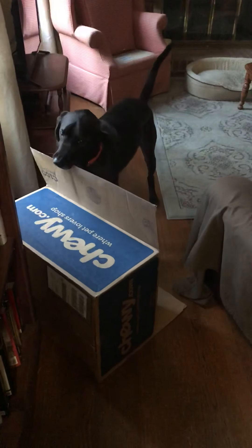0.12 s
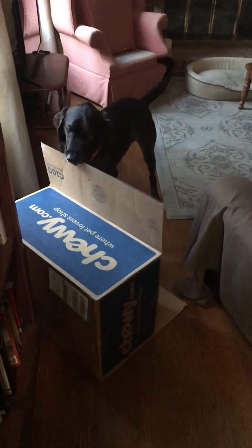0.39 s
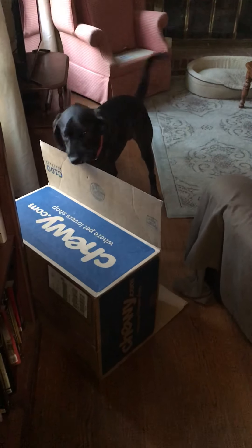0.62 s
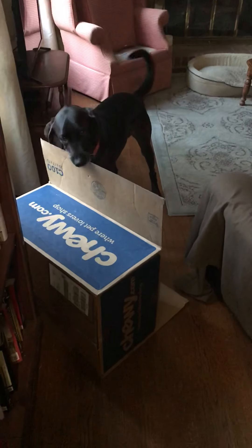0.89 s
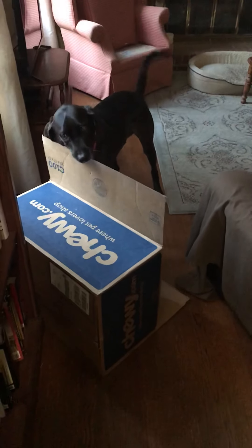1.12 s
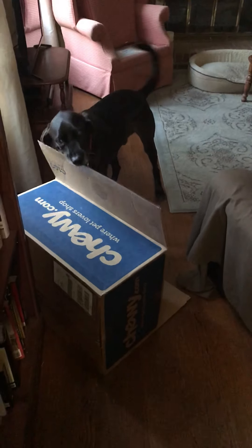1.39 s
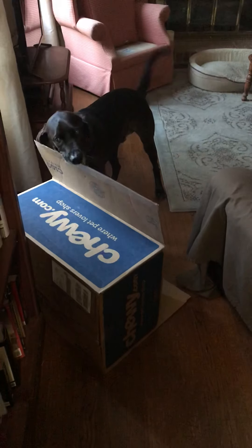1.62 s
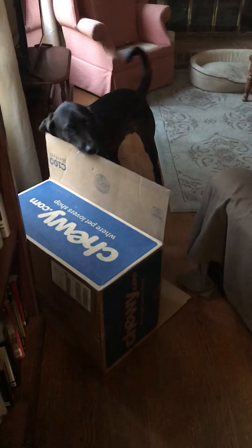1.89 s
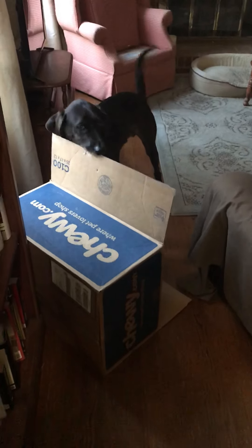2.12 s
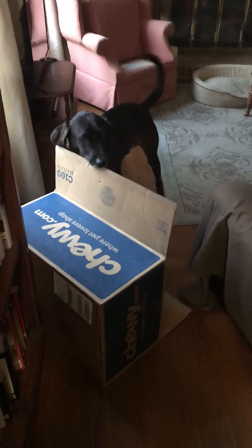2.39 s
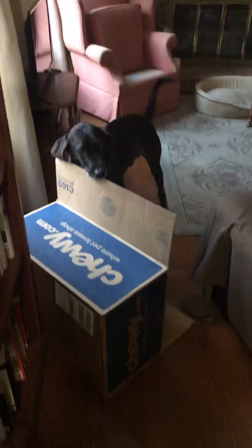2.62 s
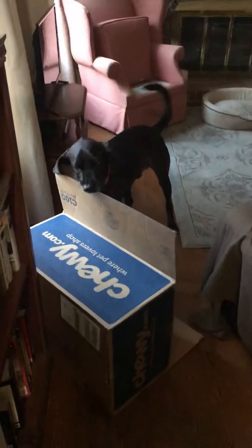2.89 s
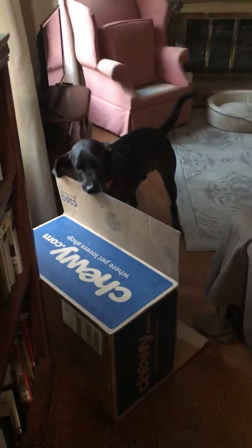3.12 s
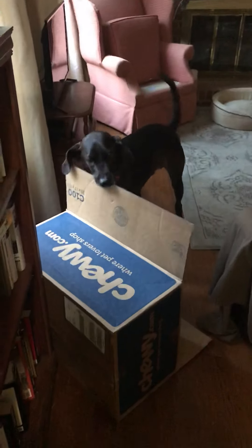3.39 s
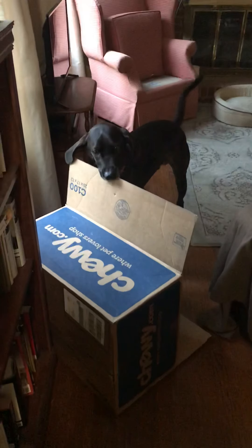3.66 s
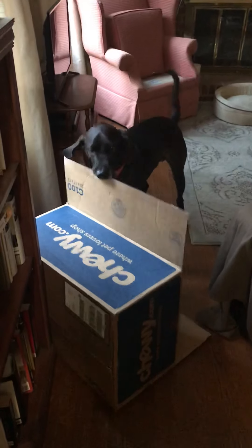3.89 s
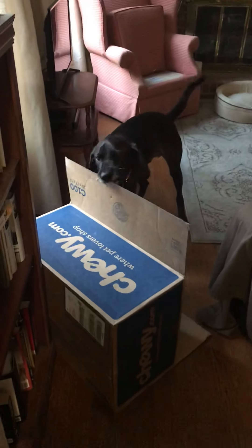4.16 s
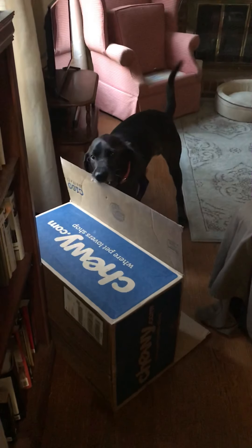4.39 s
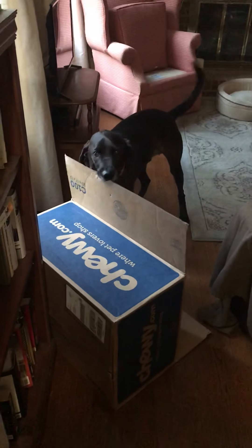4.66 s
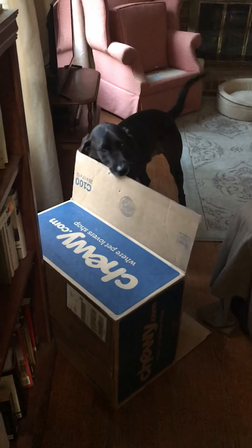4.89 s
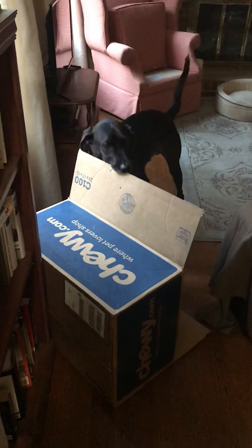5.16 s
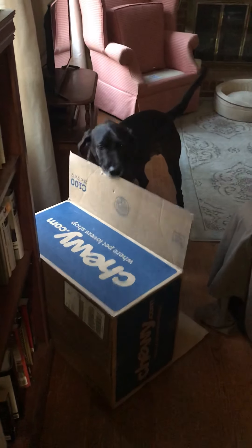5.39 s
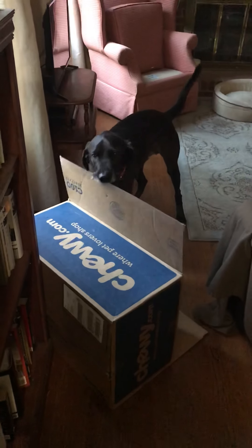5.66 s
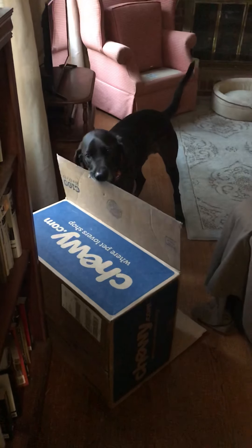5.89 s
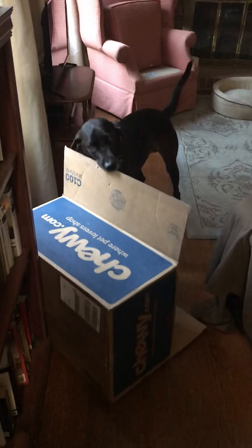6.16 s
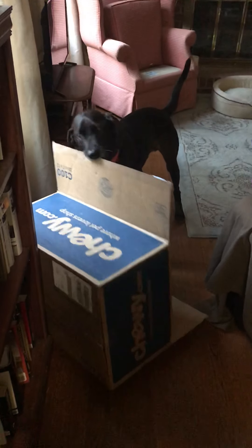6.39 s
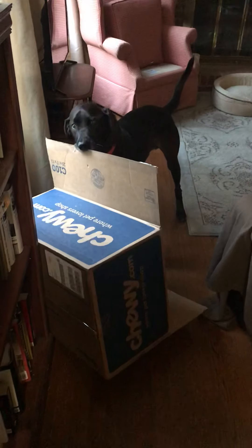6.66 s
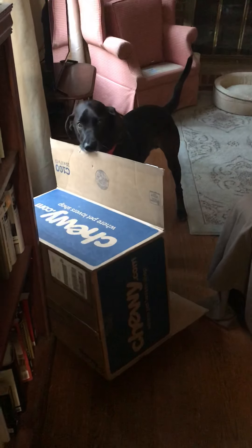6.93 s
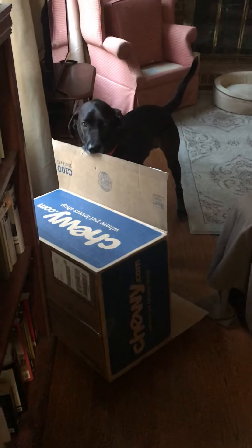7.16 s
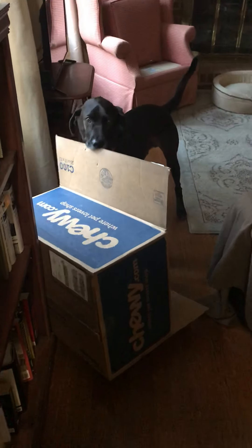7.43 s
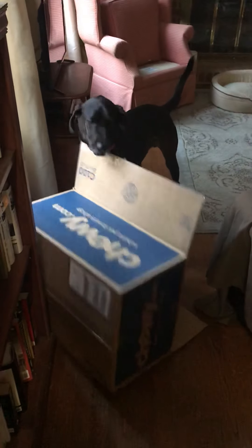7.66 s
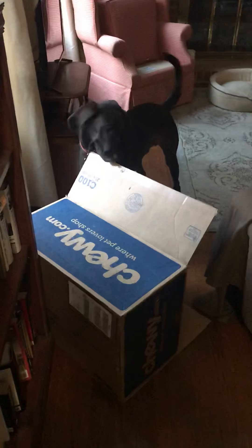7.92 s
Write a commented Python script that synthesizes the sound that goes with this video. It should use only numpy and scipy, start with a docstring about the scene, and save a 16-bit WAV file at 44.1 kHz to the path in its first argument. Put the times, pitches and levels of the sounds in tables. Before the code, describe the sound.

A dog gnaws and paws an empty cardboard box flap indoors, with dry ticks, scratchy rubbing, crackles and hollow box bumps on wood.

```python
"""A dog gnaws and paws the upright flap of an empty cardboard box on a wooden floor, near a phone.
Teeth and claws tick over the corrugation as struck modes with noisy cracks; fur and muzzle rub the
card as trains of tiny slips. The box rocks and bumps, its panels ringing briefly, and a furnished
room adds a short tail of sparse reflections over a quiet floor of shaped noise."""
import sys
import numpy as np
from scipy import signal
from scipy.fft import rfft, irfft
from scipy.io import wavfile

SR = 44100
rng = np.random.default_rng(int(sys.argv[2]) if len(sys.argv) > 2 else 0)


def makeup_ratio(level_db):
    """Linear amplitude ratio for a level in decibels (20 dB per factor of ten)."""
    decades = np.asarray(level_db, float) / 20
    return 10 ** decades


def unload_wav(signal):
    """Save mono or channel-first audio to the path in sys.argv[1] as 16-bit WAV at rate SR, clipped to [-1, 1]."""
    wavfile.write(
        sys.argv[1],
        SR,
        np.round(np.clip(np.atleast_2d(signal).T, -1, 1) * 32767).astype(np.int16),
    )


N = 354563  # length in samples

# Modes of the box, in four groups from whole body to flap edge.
# Each row: frequency in Hz, level in dB relative to the group, t60 in seconds.
BODY_MODES = [(57.5, 16.5, 0.13), (66.2, 26, 0.28)]
PANEL_MODES = [(143, -22.5, 1), (157.26, 1, 0.39), (181, -2.5, 0.16), (208.4, -2.5, 0.12),
               (301, -15.5, 0.09), (370, -8.5, 0.1)]
WALL_MODES = [(468.7, -8, 0.13), (555.4, 3, 0.066), (591, 1.5, 0.043), (789.7, 3.5, 0.047),
              (888, -7.5, 0.064), (1007, 4, 0.04), (1142, -0.5, 0.049)]
FLAP_MODES = [(1269, 15, 0.014), (1754, 14.5, 0.017), (2204, 14, 0.0081), (2770, 11.5, 0.0093),
              (3280, -15, 0.0073), (4420, 4.5, 0.0065)]
# Spectrum of cracking and rubbed card. Each row: frequency in Hz, relative density in dB per Hz.
CARD_SPECTRUM = [(2700, -0.5), (3700, -2), (4500, -1), (5500, -1.5), (6400, -1), (7600, -6.5), (9100, -4.5),
                 (13100, -9), (15300, -14), (16500, -29)]


def evened(x):
    """Scales to rms 1."""
    return x / np.sqrt(np.mean(x ** 2) + 1e-20)


def read(points, hz):
    """Looks up a curve over frequency on a log axis."""
    f, value = np.transpose(points)
    return np.interp(np.log(hz + 1), np.log(f + 1), value)


def coloured(x, points):
    """Shapes x by the spectrum in points; white noise keeps its power."""
    gain = makeup_ratio(read(points, np.fft.rfftfreq(len(x), 1 / SR)))
    return irfft(rfft(x) * evened(gain), len(x))


def filtered(x, order, hz, kind):
    """Butterworth filter, "low" or "high"."""
    return signal.sosfilt(signal.butter(order, hz, kind, fs=SR, output="sos"), x)


def mode(force, hz, t60):
    """Two-pole resonator: one decaying sine of height 1 for every unit impulse."""
    radius = 10 ** (-3 / (t60 * SR))
    w = 2 * np.pi * hz / SR
    return signal.lfilter([0, np.sin(w)], [1, -2 * radius * np.cos(w), radius ** 2], force)


def crowded(modes, apart=0.081, weaker_db=8.5, shorter=0.9):
    """Bent card is never regular: each mode has two weaker, shorter neighbours."""
    sides = [(hz * (1 + way * apart), db - weaker_db, shorter * t60)
             for hz, db, t60 in modes for way in (-1, 1)]
    return list(modes) + sides


def struck(modes, s, db, contact_s, place_db, bend, dull_db=0, core_hz=1):
    """Blows at times s ring the modes; each lands on another spot of card bent a little differently.

    A dull blow loses dull_db per octave away from core_hz."""
    out = np.zeros(N)
    hz, mode_db, t60 = np.transpose(modes)
    spot, bent = rng.standard_normal((len(s), len(modes), 2)).transpose(2, 0, 1)
    octaves = abs(np.log2(hz / core_hz))
    loss_db = np.outer(dull_db * np.ones(len(s)), octaves)
    heights = makeup_ratio(mode_db + place_db * spot - loss_db)
    heights *= makeup_ratio(db)[:, None] / np.linalg.norm(heights, axis=1, keepdims=True)
    pitches = hz * (1 + bend * bent)
    t = np.arange(round(t60.max() * SR)) / SR
    swell = 1 - (1 + t / contact_s) * np.exp(-t / contact_s)  # the card gives way over the contact time
    fade = swell * makeup_ratio(-60 * t / t60[:, None])
    for start_s, height, pitch in zip(s, heights, pitches):
        part = out[round(start_s * SR):][:len(t)]
        ring = height @ (fade * np.sin(2 * np.pi * np.outer(pitch, t)))
        part += ring[:len(part)]
    return out


def grains(per_s, spread_db):
    """Stick-slip: tiny impulses of random time, sign and size, at rms 1."""
    size = makeup_ratio(spread_db * np.minimum(rng.exponential(1, N), 4))
    happens = rng.random(N) < per_s / SR
    return evened(size * happens * rng.standard_normal(N))


def rubbed(modes, per_s, spread_db):
    """Slips excite every mode of a group; the modes wander in pitch as the card flexes."""
    flex_share = 0.025  # shift of the modes for a flex of 1
    slips = grains(per_s, spread_db)
    ring = sum(makeup_ratio(db) * evened(mode(slips, hz, t60)) for hz, db, t60 in modes)
    flex = np.interp(np.arange(N), np.linspace(0, N, num=40), rng.standard_normal(size=40))
    place = np.cumsum(1 + flex_share * flex) % (N - 1)  # read the ring at a wandering speed
    return evened(np.interp(place, np.arange(N), ring))


def chatter(s, db, modes, fall_s, rise_s=0.0018, per_s=1500):
    """After a blow the loose card keeps rattling: many small slips that swell and die away."""
    t = np.arange(SR // 2) / SR
    start = np.zeros(N)
    np.add.at(start, np.round(s * SR).astype(int), makeup_ratio(db))
    envelope = (1 - np.exp(-t / rise_s)) * np.exp(-t / fall_s)
    force = signal.oaconvolve(start, envelope)[:N] * grains(per_s, spread_db=3.0)
    return sum(makeup_ratio(mode_db) * np.sqrt(1 / (t60 * SR)) * mode(force, hz, t60)
               for hz, mode_db, t60 in modes)


def ticks():
    """Teeth and claws catch: the flap rings in a few quick slips, cracks in the treble, wakes the walls."""
    # Each row: start in seconds, force in dB, heft into the walls in dB over the force,
    # sharpness of the crack in dB over the force.
    catch_rows = [(0.331, -29.5, -5, -9), (0.361, -14.5, 7.5, -26), (0.5927, -38.5, 3.5, -36.5),
                  (0.9597, -36, -6, -10), (0.9797, -38, -25, -25), (1.0144, -40, -3, -15),
                  (1.3327, -38.5, -7, -10), (1.3778, -32, -1.5, -20), (1.452, -34.5, -7, -14),
                  (1.482, -24.5, -7, -12), (1.5423, -27.5, -5, -21), (1.5636, -33, -8, -15),
                  (1.6018, -23, -8.5, -12), (1.611, -21.5, -8, -37), (1.6368, -27, -14, -8.5),
                  (1.672, -24, -10, -11), (2.064, -22, -10.5, -14.5), (2.175, -33, -4, -15),
                  (2.2568, -39, -3, -6.5), (2.308, -29, -9, -10), (2.442, -39, -6, -9.5),
                  (2.4821, -33.5, -6, -8), (2.6267, -30, -6, -15.5), (2.7157, -40.5, 3, -18),
                  (2.861, -38, 14.5, -11), (2.8848, -19, -1, -20), (2.9344, -43, -9, -16),
                  (3.044, -37, -45, -9), (3.095, -26, -6.5, -14.5), (3.1206, -25, -24, -14),
                  (3.1453, -31.5, -3, -25), (3.1625, -23.5, -14.5, -25), (3.171, -39, -20, -23),
                  (3.2091, -20.5, -25, -11), (3.235, -23.5, -4.5, -17), (3.2594, -18.5, -11, -15),
                  (3.2874, -21, -28, -20), (3.4738, -26.5, -6.5, -29), (3.483, -26.5, -31, -27),
                  (3.5017, -22.5, -16, -16.5), (3.5094, -20, -9, -24), (3.5185, -22, -27, -27),
                  (3.5605, -16, -12.5, -20.5), (3.5695, -24, -11, -29), (3.578, -27, -21, -30),
                  (3.6025, -23, -36, -14), (3.61, -23, -16, -25), (3.617, -23, -26, -24),
                  (3.9734, -35, 8, -6.5), (4.056, -21.5, -5, -22), (4.2346, -30, -3, -23.5),
                  (4.2494, -49.5, 14, -25), (4.5348, -31.5, -3, -12), (4.7323, -52, -33, 6),
                  (4.8038, -36, -0.5, -19), (4.836, -40.5, 2, -23), (4.8776, -43.5, -5.5, -0.5),
                  (4.905, -49, -11, -5), (4.929, -35, -5.5, -16), (4.9728, -39.5, -10, -4.5),
                  (5.3833, -23, -17.5, -15), (5.5841, -27, -3.5, -16.5), (5.7933, -35.5, -20, -18),
                  (5.9412, -24, -9, -14), (5.9794, -32.5, -7.5, -18), (6.1325, -32, -3.5, -14),
                  (6.4188, -50.5, -34, -3), (7.2876, -28, -18.5, -19.5), (7.423, -38, -0.5, -10.5),
                  (7.4803, -33.5, -20, 5.5), (7.4955, -21.5, -4, -17), (7.5674, -39, 14.5, -26),
                  (7.6075, -9.5, -8, -20.5), (7.699, -40, 8, -18), (7.8402, -41, 1.5, -3)]
    s, force_db, heft_db, sharp_db = np.transpose(catch_rows)

    start = np.zeros(N)
    start[np.round(s * SR).astype(int)] = makeup_ratio(force_db + sharp_db)
    t = np.arange(3000) / SR
    fade = (1 - np.exp(-t / 0.000084)) * (np.exp(-t / 0.0032) + 0.3 * np.exp(-t / 0.021))
    crackle = signal.oaconvolve(start, fade)[:N] * grains(per_s=38000, spread_db=3.0)
    crack = coloured(crackle + 0.6 * start, CARD_SPECTRUM)

    later = np.cumsum(rng.uniform(0.000753, 0.0039, (len(s), 4)), 1)  # seconds after the first slip
    slip_s = np.c_[s, s[:, None] + later].ravel()
    weaker_db = np.c_[0 * s, 9.0 + 1200.0 * later]  # each slip weaker than the last
    slip_db = (force_db[:, None] - weaker_db).ravel()
    edge_db = np.maximum(-4.5 - heft_db, 0)  # a light scratch rings mostly the stiff edge
    flap = struck(crowded(FLAP_MODES), slip_s, slip_db + 3.0, contact_s=0.00027, place_db=3.5, bend=0.035,
                  dull_db=np.repeat(edge_db, 1 + later.shape[1]), core_hz=2740.0)

    broad_db = np.maximum(heft_db + 10.0, 0)  # a heavy bite rings the broad wall, not its edges
    rattle = chatter(s, force_db + heft_db - 18.5, crowded(WALL_MODES), fall_s=0.042)
    walls = struck(crowded(WALL_MODES), s, force_db + heft_db + 6.0, contact_s=0.0028, place_db=3.5,
                   bend=0.013, dull_db=broad_db, core_hz=573.0)
    return flap + crack + rattle + walls


def drag(pressure_db, speed_db):
    """Rasp, rustle and hiss gains of a rub: faster fur rustles more and hisses more still."""
    rustle_db = pressure_db - 6 + speed_db
    hiss_db = pressure_db - 14.5 + 1.47 * speed_db
    return makeup_ratio([pressure_db, rustle_db, hiss_db])


def strokes():
    """Rasp, rustle and hiss gains of short scuffs along the flap: each swells and fades."""
    # Each row: start in seconds, length in seconds, pressure in dB, speed in dB.
    scuff_rows = [(0.0, 0.045, -44.5, 1), (0.764, 0.079, -51, 4), (0.794, 0.036, -41.5, -8),
                  (1.672, 0.19, -54.5, -3), (1.963, 0.1, -51, 6.5), (2.033, 0.1, -52.5, -2),
                  (2.295, 0.023, -47.5, 6.5), (2.372, 0.024, -66, 16), (3.008, 0.041, -61.5, 7),
                  (3.076, 0.026, -49, 1.5), (3.768, 0.054, -54, 6.5), (3.8564, 0.036, -43, -15),
                  (4.227, 0.013, -48.5, -23), (4.306, 0.091, -60, 4.5), (4.387, 0.017, -54, 7.5),
                  (4.545, 0.077, -65, -34), (5.204, 0.077, -72.5, 19), (5.702, 0.085, -58.5, -20),
                  (6.655, 0.1, -82, 23), (7.21, 0.11, -81.5, 23), (7.451, 0.079, -52, 3.5),
                  (7.685, 0.037, -68, 19), (7.719, 0.04, -46.5, 11.5), (7.944, 0.051, -57, 9.5)]
    flutes_per_s, flute_depth = 58.3, 0.25  # a scuff stutters as it crosses the ridges of the corrugation
    gains = np.zeros((3, N))
    for s, length_s, pressure_db, speed_db in scuff_rows:
        u = np.arange(0, 1, 1 / (length_s * SR))  # share of the scuff gone by
        ridges = 1 + flute_depth * np.cos(2 * np.pi * flutes_per_s * length_s * u)
        swell = np.sin(np.pi * u ** 0.5) ** 0.5
        part = gains[:, round(s * SR):][:, :len(u)]
        part += np.outer(drag(pressure_db, speed_db), ridges * swell)[:, :part.shape[1]]
    return gains


def contact():
    """Muzzle and paws drag on the card: a rasp through walls and flap, a rustle and a finer hiss."""
    # Each row: time in seconds, pressure in dB, speed in dB; read as straight lines between rows.
    slide_rows = [(0.0, -61, 8.5), (.45, -56, 0.5), (1.2, -62, 1), (1.45, -58.5, -1), (1.63, -51.5, 2),
                  (1.9, -58.5, 2.5), (2.4, -58.5, 0.5), (2.75, -68, 4.5), (3.07, -53.5, -5.5),
                  (3.4, -61, 9), (3.551, -50, -5.5), (3.76, -64, 9.5), (4.252, -52.5, -4.5),
                  (5.25, -67, 3.5), (5.62, -52, -1.5), (6.05, -60.5, 5), (6.28, -73, 9.5), (6.7, -60.5, 1),
                  (7.02, -53, 4), (7.17, -66, -1.5), (7.35, -67, 3), (7.6, -47, 1.5), (8.04, -63, 2)]
    s, pressure_db, speed_db = np.transpose(slide_rows)
    t = np.arange(N) / SR
    scrape, rustle, hiss = drag(np.interp(t, s, pressure_db), np.interp(t, s, speed_db))
    rasp_stroke, rustle_stroke, hiss_stroke = strokes()

    catches = (rng.random(N) < 60.0 / SR) * rng.uniform(0, 1, N)  # fibres catch and let go in clumps
    clumps = evened(1 + 1.2 * signal.oaconvolve(catches, np.hanning(400), "same"))
    walls = rubbed(crowded(WALL_MODES), per_s=1200, spread_db=5.0)
    flap = rubbed(FLAP_MODES, per_s=2500, spread_db=-1.5)
    lid = rubbed(crowded(PANEL_MODES[-2:]), per_s=450, spread_db=4.0)
    card = makeup_ratio(-2.0) * walls + makeup_ratio(-6.5) * clumps * flap + makeup_ratio(-3.5) * lid
    scuffs = rasp_stroke * (clumps * flap + 0.55 * walls)

    fibres = clumps * coloured(grains(per_s=9000, spread_db=2.0), CARD_SPECTRUM)
    coarse = evened(filtered(fibres, 4, 9500, "low"))
    fine = evened(filtered(fibres, 4, 9500, "high"))
    return scrape * card + (rustle + rustle_stroke) * coarse + (hiss + hiss_stroke) * fine + scuffs


def bumps():
    """The box knocks on the floor: a soft, heavy blow rings panels and body and leaves a rattle."""
    # Each row: start in seconds, side panel level in dB, whole-box boom level in dB.
    knock_rows = [(0.365, -20, -26), (1.31, -35.5, -33), (2.862, -32.5, -48), (2.885, -25.5, -21.5),
                  (3.048, -28, -27.5), (3.866, -38.5, -32.5), (3.975, -17, -33), (4.003, -20, -54),
                  (4.044, -21.5, -43), (5.477, -22, -33), (5.496, -21.5, -27), (5.59, -31, -29.5),
                  (7.245, -37.5, -37.5), (7.53, -25, -18.5), (7.58, -21, -16), (7.625, -20, -33),
                  (7.645, -44, -17), (7.741, -13, -48)]
    s, panel_db, boom_db = np.transpose(knock_rows)
    panels = struck(PANEL_MODES, s, panel_db, contact_s=0.00097, place_db=3.0, bend=0.022)
    boom = struck(BODY_MODES, s, boom_db, contact_s=0.004, place_db=2.5, bend=0.03)
    rattle = chatter(s, panel_db + 0.5, crowded(PANEL_MODES[-3:] + WALL_MODES[:1]), fall_s=0.02)
    return panels + boom + rattle


def sway():
    """The dog tugs: the box shudders and rocks on the boards while a tug is held, then settles."""
    # Each row: start in seconds, force in dB, rocking over shudder in dB, time held in seconds.
    tug_rows = [(0.0, -47, 5, 0.02), (.38, -52.5, 10.5, 0.3), (.74, -45.5, 2, 0.086),
                (0.96, -51, 8.5, 0.075), (1.32, -45, 8, 0.081), (1.6, -53.5, -19, 0.17),
                (2.06, -50.5, 5, 0.24), (2.36, -65, 11, 0.14), (3.05, -46.5, -2, 0.2),
                (3.99, -49.5, 19, 0.046), (4.268, -48, 8.5, 0.071), (4.53, -45, -1.5, 0.041),
                (4.71, -52, 1, 0.1), (5.52, -49.5, 15, 0.096), (5.929, -59, -7, 0.28),
                (6.5, -54.5, -5, 0.054), (6.9, -53.5, -7, 0.12), (7.5, -38.5, 5, 0.054),
                (7.655, -44, 12, 0.05), (7.9, -57.5, 13, 0.044)]
    rise_s = 0.01
    fall_db_per_s = [92, 91]  # shudder, rocking
    rest_db = [[-60.5], [-63.5]]  # shudder, rocking: the box never stands quite still under the dog
    power = np.ones((2, N)) * makeup_ratio(rest_db) ** 2
    for s, force_db, rock_db, held_s in tug_rows:
        part = power[:, round(s * SR):][:, :SR]
        t = np.arange(part.shape[1]) / SR
        fall_db = np.outer(fall_db_per_s, np.maximum(t - held_s, 0))
        level_db = force_db + np.array([[0], [rock_db]]) - fall_db
        part += (np.minimum(t / rise_s, 1) * makeup_ratio(level_db)) ** 2
    shudder, rock = np.sqrt(power)
    shuddering = shudder * rubbed(PANEL_MODES, per_s=900, spread_db=1.0)
    rocking = rock * rubbed(BODY_MODES, per_s=400, spread_db=0.5)
    return shuddering + rocking


def room(x):
    """Sparse reflections of random sign, each band dying at its own speed; deep bass is not thrown back."""
    # Decay of the furnished room. Each row: frequency in Hz, t60 in seconds.
    decay_rows = [(100, 0.73), (500, 0.41), (2000, 0.31), (8000, 0.23)]
    taps = np.zeros(SR // 2)
    slots = np.arange(180, len(taps) - 20, 20)  # one reflection somewhere in every 20 samples
    taps[slots + rng.integers(0, 20, len(slots))] = rng.choice([-1.0, 1.0], len(slots))
    hz, t, bands = signal.stft(taps, SR, nperseg=256)
    fading = bands * makeup_ratio(-60 * t / read(decay_rows, hz)[:, None])
    tail = signal.istft(fading, SR, nperseg=256)[1]
    thin = filtered(x, 2, 150, "high")
    return signal.oaconvolve(thin, tail / np.linalg.norm(tail))[:N]


def hush():
    """The quiet floor under everything: steady noise with a shaped spectrum."""
    # Each row: frequency in Hz, relative density in dB per Hz.
    hush_rows = [(18, -21), (30, 1), (167, -14), (519, -31.5), (625, -34), (694, -25), (5590, -60),
                 (15200, -32), (16500, -70)]
    return makeup_ratio(-62.5) * coloured(rng.standard_normal(N), hush_rows)


def scene():
    """The box, its echo in the room and the hush, as one channel."""
    box = ticks() + contact() + bumps() + sway()
    return (box + makeup_ratio(-8.5) * room(box) + hush())[None]


def band_limit(x):
    """A steep low-pass at the top of the band."""
    return signal.sosfilt(signal.butter(12, 16850, fs=SR, output="sos"), x)


def record(dry):
    """The small microphone loses the deepest bass and has a dip in its port."""
    heard = filtered(dry, 3, 42.0, "high")
    notched = signal.lfilter(*signal.iirnotch(10600.0, 8.0, SR), heard)
    mix = 0.45 * heard + 0.52 * notched  # a partial dip at 10.6 kHz
    return band_limit(mix)


dry = scene()
out = record(dry)
unload_wav(out)
```